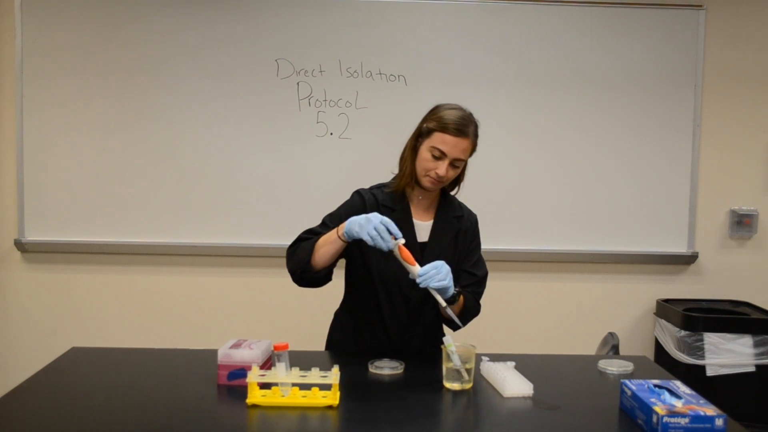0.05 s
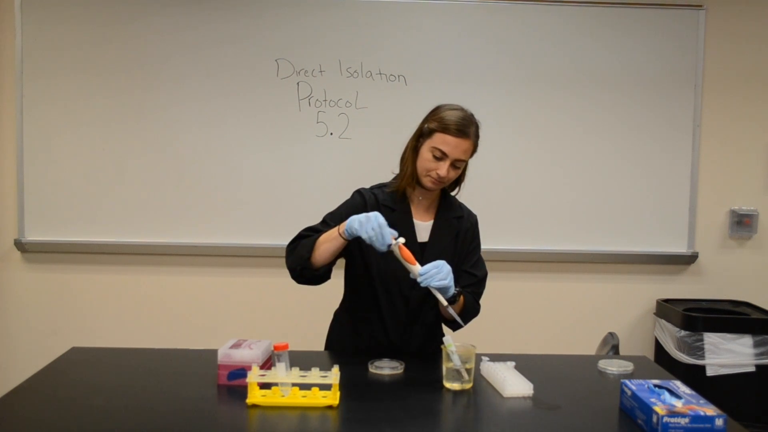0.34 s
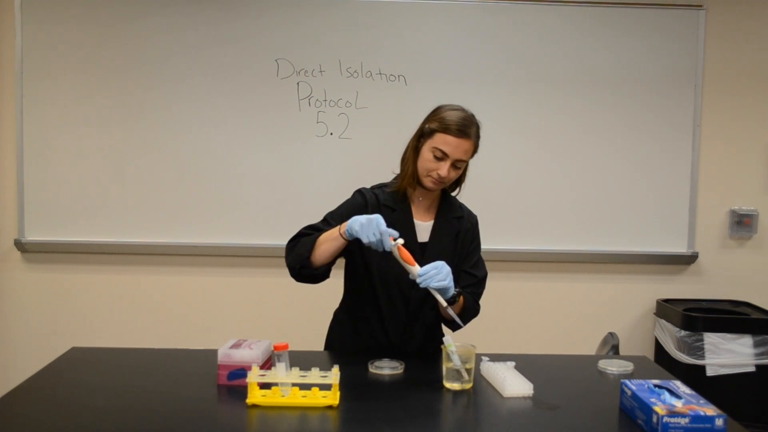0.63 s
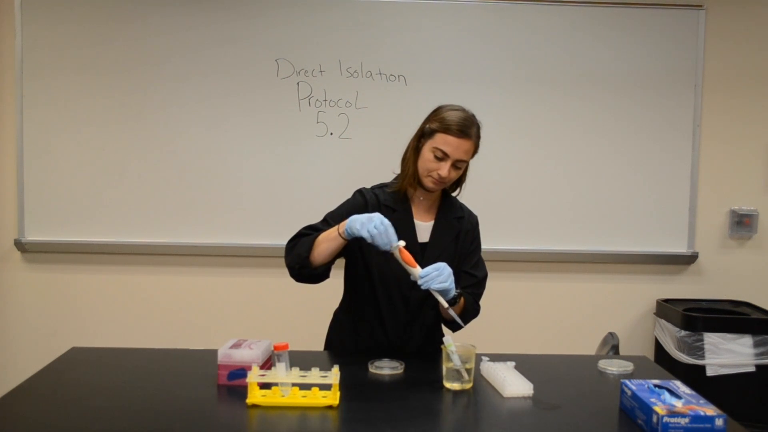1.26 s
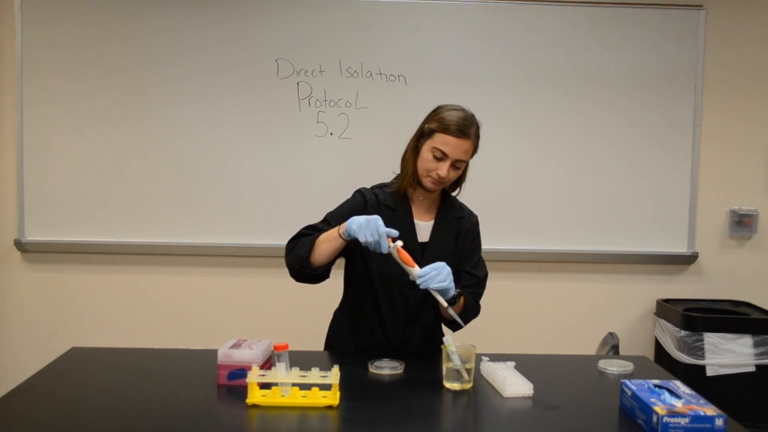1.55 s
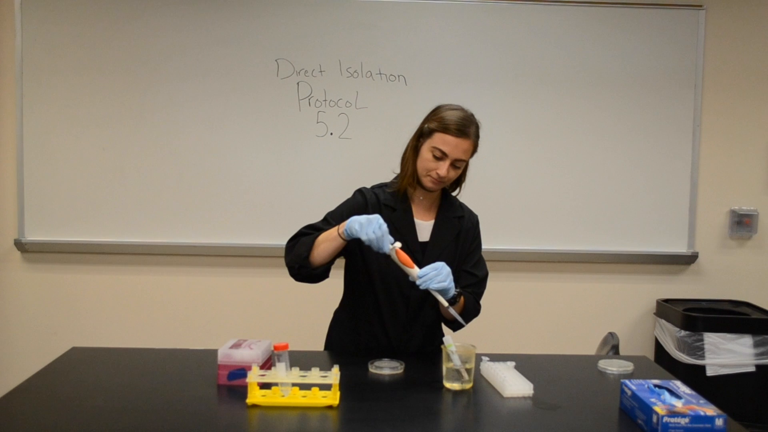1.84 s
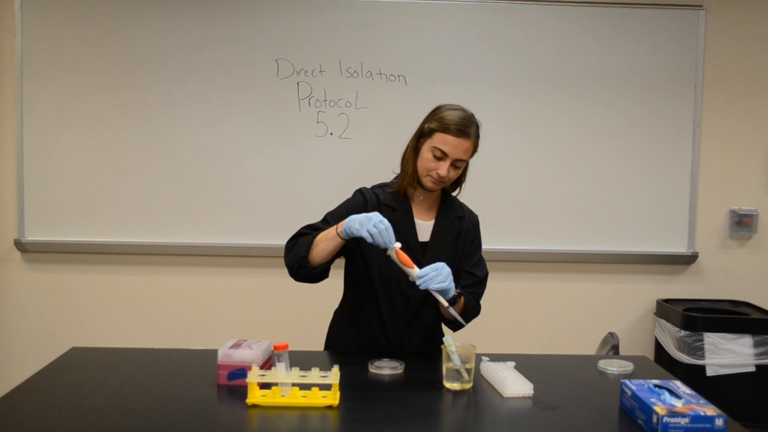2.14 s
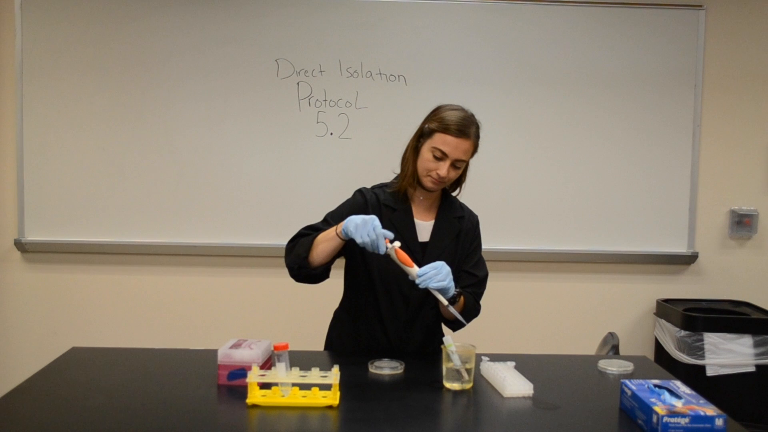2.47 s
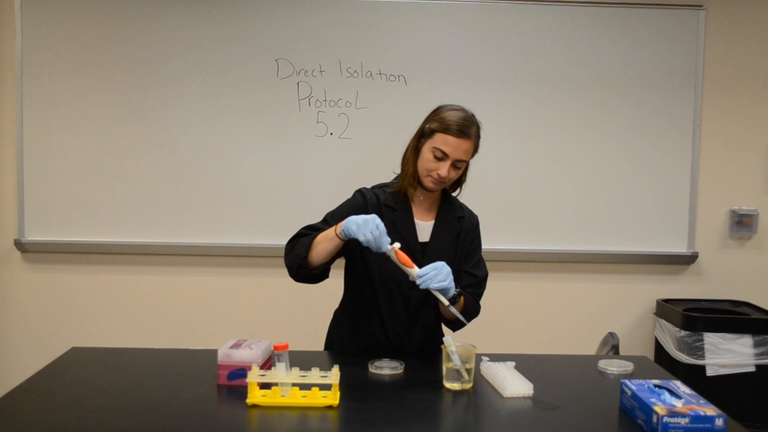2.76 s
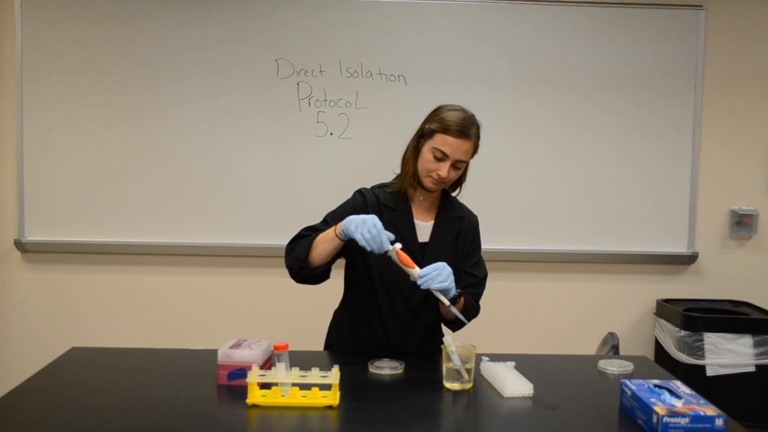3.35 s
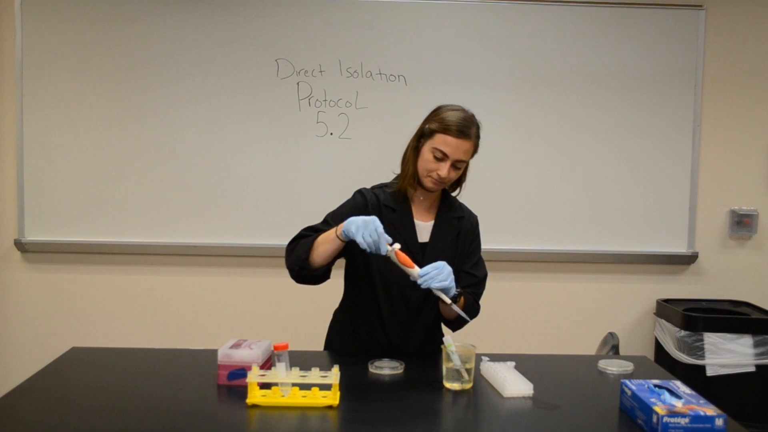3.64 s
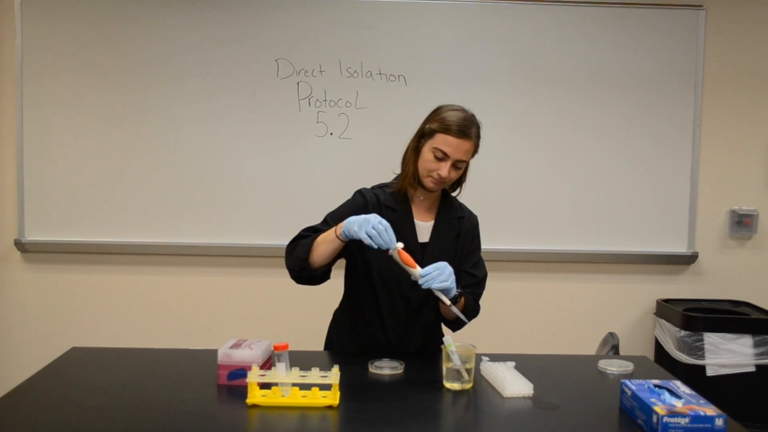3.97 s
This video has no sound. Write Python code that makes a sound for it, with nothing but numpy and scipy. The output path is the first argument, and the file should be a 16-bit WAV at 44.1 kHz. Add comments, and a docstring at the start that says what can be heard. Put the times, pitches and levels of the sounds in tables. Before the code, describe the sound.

A plastic lab pipette clicks in quick short bursts in a bare, ventilated room.

```python
"""Ventilation rumbles from the start. A handheld pipette's volume knob is twisted in short strokes,
about four a second. In each stroke the pawl first scrapes up a tooth, then the ratchet slips over
two to five teeth; every tooth snaps and briefly rings the plastic barrel. The bench, wall and ceiling
throw each click back, and the bare room rings on into the next stroke."""
import sys
import numpy as np
from scipy import signal
from scipy.fft import rfft, irfft, next_fast_len
from scipy.io import wavfile
from scipy.ndimage import uniform_filter1d

SR = 44100
rng = np.random.default_rng(int(sys.argv[2]) if len(sys.argv) > 2 else 0)


def persist_wave(psi):
    """Save psi, clipped to +-1, as 16-bit WAV."""
    counts = np.round(np.clip(psi, -1, 1) * 32767).astype(np.int16)
    wavfile.write(sys.argv[1], SR, np.atleast_2d(counts).T)


N = 176400  # 4 s

STROKE_GAP_S = 0.1
TAIL_CHANGE = 0.6  # share of tail energy that changes as the hands move between strokes
PATH_SWAY = 0.04  # relative scatter of the reflection delays
# ratchet teeth: t/s, level/dB, extra treble/dB
TEETH = [(0.04, -18.5, 3), (0.0636, -22.2, 0.5), (0.0678, -24.1, -5), (0.0774, -23, 4.9),
         (0.299, -21.3, 1.0), (0.3156, -19.8, -0.5), (0.3292, -21.5, 0.4), (0.3502, -23, 0),
         (0.545, -22.5, -1.0), (0.5676, -21, -1.0), (0.587, -20.6, 3.6), (0.6114, -19, 2.0),
         (0.7848, -20.7, -0.4), (0.802, -21, 1.7), (0.816, -23.5, -3), (0.8325, -21.2, 1.0),
         (1.0262, -20.5, -1.5), (1.0392, -20, -1), (1.051, -22.5, 1), (1.2561, -24.5, 0.1),
         (1.2717, -19.5, 0.5), (1.2839, -23, -1.8), (1.4592, -21, 2), (1.4882, -22.8, -5.3),
         (1.5015, -19.0, 0.5), (1.5137, -21.5, -2), (1.715, -22, 0.5), (1.7196, -21.7, -7.4),
         (1.7309, -20.9, 0), (1.7426, -21, -1.5), (1.91, -22, 2), (1.9385, -20.0, 0), (1.9554, -20.4, -1),
         (1.9593, -21.5, -2), (1.9671, -21.5, 5), (2.178, -23.5, -1.5), (2.1921, -21, 3),
         (2.2051, -21.5, -3.5), (2.3879, -21, 0.5), (2.4063, -21.5, -0.3), (2.4213, -23.5, -2),
         (2.6239, -20.7, -2), (2.6392, -19, 0.5), (2.651, -22, 0.5), (2.8334, -23, 2.5), (2.8586, -23, -3),
         (2.8726, -18.8, -0.7), (2.886, -21.0, -2), (3.0806, -20.8, 0.5), (3.0962, -19.0, -1.7),
         (3.1079, -21.5, 0.5), (3.2871, -20.9, -1.5), (3.3087, -20.5, 1.5), (3.324, -20, -2.2),
         (3.3373, -23, 1), (3.5414, -24, -2), (3.557, -20, 1), (3.7649, -18.6, -1), (3.7766, -19.4, -0.5),
         (3.7891, -20, 1.0), (3.9982, -20, 1)]
# reflections off bench, wall, ceiling: delay/s, level/dB
REFLECTIONS = [(.0046, -7.5), (.0061, -9.5), (.0092, -21), (0.0119, -19), (0.0159, -24)]
# reflection response: f/Hz, level/dB
REFLECTION_EQ = [(1000, -0.5), (3800, 4.5), (6500, 3.5), (9500, 3.5)]
# reverberation response: f/Hz, level/dB
REVERB_EQ = [(500, 6), (2000, -1), (3800, -2), (6500, -1), (9500, 1.5)]
def pipette(reverb_trim_db=-1):
    """Each stroke is a scrape, then a run of clicks; every surface reflects its own side of the barrel."""
    direct, early, late = np.zeros((3, N))
    teeth = np.array(TEETH)
    stroke_starts = np.flatnonzero(np.diff(teeth[:, 0]) > STROKE_GAP_S) + 1
    still_tail = room_tail()
    for stroke in np.split(teeth, stroke_starts):
        tail = np.sqrt(1 - TAIL_CHANGE) * still_tail + np.sqrt(TAIL_CHANGE) * room_tail()
        add(direct, stroke[0, 0] - SCRAPE_S, pawl_scrape())
        for start_s, db, treble_db in stroke:
            add(direct, start_s, amp(db) * tooth_click(treble_db))
            add(late, start_s, amp(db) * signal.fftconvolve(tooth_click(treble_db), tail))
            for (delay_s, wall_db), sway in zip(REFLECTIONS, rng.standard_normal(len(REFLECTIONS))):
                arrival_s = start_s + delay_s * (1 + PATH_SWAY * sway)
                add(early, arrival_s, amp(db + wall_db) * tooth_click(treble_db))
    early = filtered(early, lambda hz: amp(along(REFLECTION_EQ, hz)))
    late = filtered(late, lambda hz: amp(reverb_trim_db + along(REVERB_EQ, hz)))
    return direct + early + late


SNAP_DB, SNAP_RISE_S, SNAP_T60_S = -1, 0.00023, 0.017
CRACK_DB, CRACK_T60_S = 2, 0.004
MODE_SCATTER_DB, MODE_DETUNE = 4, 0.018  # the grip changes from tooth to tooth
MODE_RISE_CYCLES = 1.96  # low modes swell more slowly
# snap spectrum: f/Hz, relative level/dB
SNAP_SPECTRUM = [(200, -31), (800, -5.5), (1400, -5), (2000, 3), (2900, 3.5), (4200, 6.5), (5200, 5),
                 (7000, 6.5), (7900, 3), (9700, 9.5), (10500, -5)]
# barrel modes: f/Hz, relative level/dB, T60/s
BARREL_MODES = [(1106, -22.5, 0.025), (2070, -10.5, 0.014), (2670, -9.5, 0.015), (2913, -7, .018),
                (3384, -8, 0.024), (3895, -9, 0.029), (4103, -6, 0.018), (4446, -11, 0.018),
                (6730, -10, 0.007), (8740, -14.5, 0.0093), (9680, -10.5, .01)]
def tooth_click(treble_db):
    """A tooth slips: a crack and a short snap over the ringing barrel; rms 1 over the first 3 ms."""
    t = np.arange(SR // 50) / SR
    envelope = amp(SNAP_DB) * fade(t, SNAP_T60_S) + amp(CRACK_DB) * fade(t, CRACK_T60_S)
    attack = 1 - np.exp(-t / SNAP_RISE_S)
    click = envelope * attack * noise(SNAP_SPECTRUM, len(t))
    for mode_hz, db, t60_s in BARREL_MODES:
        level, pitch, phase = rng.standard_normal(3)
        ring = fade(t, t60_s) * (1 - np.exp(-mode_hz * t / MODE_RISE_CYCLES))
        tone = np.sin(2 * np.pi * (mode_hz * (1 + MODE_DETUNE * pitch) * t + phase))
        click += amp(db + MODE_SCATTER_DB * level) * ring * tone
    treble_shelf = [(4000, 0.012), (6000, treble_db)]  # f/Hz, level/dB
    click = filtered(click, lambda hz: amp(along(treble_shelf, hz)))
    return click / np.sqrt(np.mean(click[:132] ** 2))


SCRAPE_S, SCRAPE_DB, SCRAPE_SCATTER_DB, GRAIN_DB = 0.015, -40.5, 2.5, 1.5
# scrape spectrum: f/Hz, relative level/dB
SCRAPE_SPECTRUM = [(500, -12), (1500, 5), (3500, 3.5), (7000, 0), (10000, 2.5)]
def pawl_scrape():
    """The pawl rides up its tooth with a brief, faint, grainy rub."""
    size = int(SCRAPE_S * SR)
    grain = unit(uniform_filter1d(rng.standard_normal(SR // 10), size=60))[:size]
    rub = unit(amp(GRAIN_DB * grain) * noise(SCRAPE_SPECTRUM, SR // 10)[:size])
    gain = amp(SCRAPE_DB + SCRAPE_SCATTER_DB * rng.standard_normal())
    return gain * rub * signal.windows.tukey(size, 0.5)


# room decay: f/Hz, T60/s
ROOM_DECAY = [(500, 0.22), (3500, 0.51), (6500, 0.43), (10000, 0.45)]
def room_tail(delay_s=0.0051, build_s=0.0017):
    """Diffuse response of the bare room, energy 1; the lows die first."""
    hz, frame_s, spectrum = signal.stft(rng.standard_normal(SR // 2), SR, nperseg=256)
    decay = fade(frame_s, along(ROOM_DECAY, hz)[:, None])
    _, tail = signal.istft(spectrum * decay, SR, nperseg=256)
    age_s = np.maximum(np.arange(len(tail)) / SR - delay_s, 0)
    tail *= 1 - np.exp(-age_s / build_s)
    return tail / np.linalg.norm(tail)


# airflow spectrum: f/Hz, relative level/dB
AIR_SPECTRUM = [(20, -32), (45, -12), (90, -10.5), (170, 1), (320, 0), (430, -3), (800, -6.5), (1400, -13),
                (3000, -14.5), (7000, -19), (10000, -26)]
# duct resonances: f/Hz, half-width/Hz, level/dB
DUCT_MODES = [(213.3, 17, -51), (337, 7.9, -49.5)]
def ventilation(air_db=-39):
    """Steady rushing air; the duct resonates in two narrow, wavering tones."""
    air = amp(air_db) * noise(AIR_SPECTRUM, N)
    for centre_hz, half_width_hz, db in DUCT_MODES:
        tone = filtered(rng.standard_normal(N), lambda hz: bell(hz, centre_hz, half_width_hz))
        air += amp(db) * unit(tone)
    return air


def amp(db):
    """Decibels to gain."""
    return 10 ** (np.asarray(db) / 20)


def unit(x):
    """Scale to rms 1."""
    return x / np.sqrt(np.mean(x ** 2) + 1e-20)


def along(points, hz):
    """Interpolate (f/Hz, value) points on a log frequency axis."""
    point_hz, values = np.transpose(points)
    return np.interp(np.log(hz + 1), np.log(point_hz + 1), values)


def bell(hz, centre_hz, half_width_hz):
    """Resonance curve of height 1."""
    return 1 / (1 + ((hz - centre_hz) / half_width_hz) ** 2)


def filtered(x, response):
    """Zero-phase filter with gain response(hz)."""
    size = next_fast_len(len(x) + 1024)
    hz = np.fft.rfftfreq(size, 1 / SR)
    return irfft(rfft(x, size) * response(hz), size)[:len(x)]


def noise(spectrum, size):
    """Coloured noise, rms 1."""
    return unit(filtered(rng.standard_normal(size), lambda hz: amp(along(spectrum, hz))))


def fade(t, t60_s):
    """Exponential decay."""
    return np.exp(-np.log(1000) * t / t60_s)


def add(track, start_s, sound):
    """Mix a sound into a track."""
    part = track[max(round(start_s * SR), 0):][:len(sound)]
    part += sound[:len(part)]


def scene():
    """The pipette in the ventilated room."""
    return (pipette() + ventilation())[None]


NOTCH_HZ, NOTCH_HALF_WIDTH_HZ, NOTCH_DB = 8000, 130, -5.5
CLIP_LEVEL, CLIP_KNEE = 0.4, 4
CUTOFF_HZ, EDGE_HZ = 10750, 110
def record(dry):
    """The microphone's narrow treble dip, then rounded peaks and a steep band limit."""
    notch = lambda hz: amp(NOTCH_DB * bell(hz, NOTCH_HZ, NOTCH_HALF_WIDTH_HZ))
    lowpass = lambda hz: (1 - np.tanh((hz - CUTOFF_HZ) / (2 * EDGE_HZ))) / 2
    notched = filtered(dry[0], lambda hz: notch(hz) * (hz < CUTOFF_HZ + 5 * EDGE_HZ))
    rounded = notched / (1 + np.abs(notched / CLIP_LEVEL) ** CLIP_KNEE) ** (1 / CLIP_KNEE)
    return filtered(rounded, lowpass)[None]


dry = scene()
out = record(dry)
persist_wave(out)
```